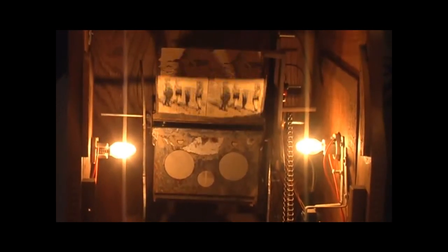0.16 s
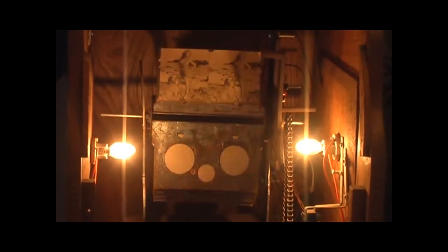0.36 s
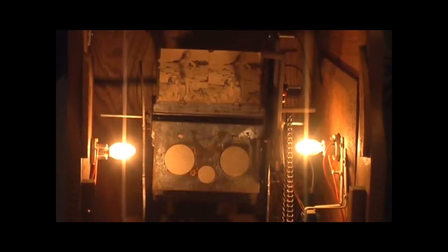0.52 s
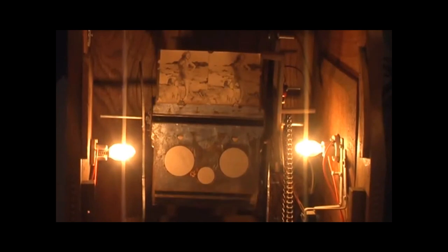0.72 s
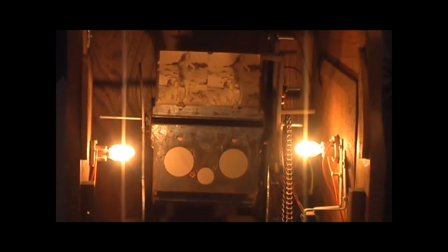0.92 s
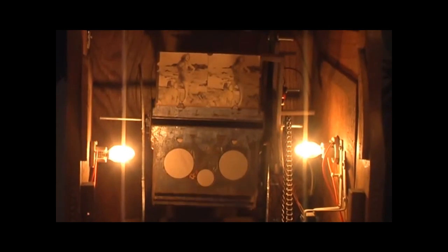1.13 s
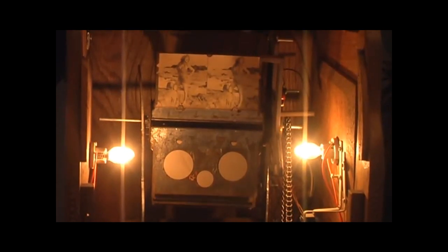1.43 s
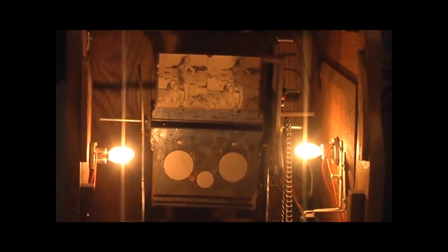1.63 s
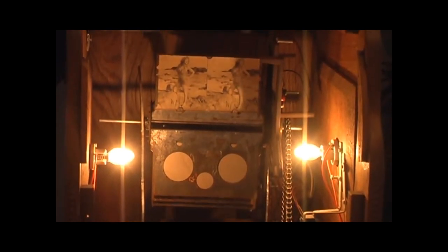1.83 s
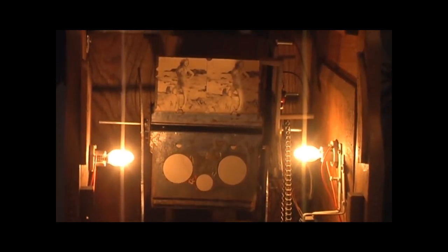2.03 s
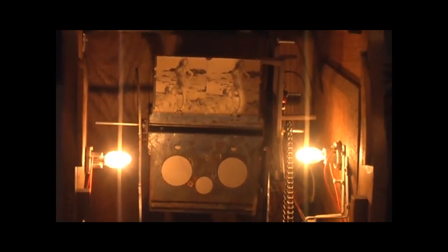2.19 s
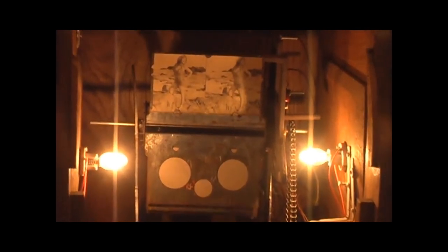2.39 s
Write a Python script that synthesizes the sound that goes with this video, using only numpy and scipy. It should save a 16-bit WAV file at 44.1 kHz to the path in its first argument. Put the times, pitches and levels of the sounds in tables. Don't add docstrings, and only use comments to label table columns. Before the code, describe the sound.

A stiff card clacks down sharply once over the gritty, pulsing whirr of a small motor

```python
import sys
import numpy as np
from scipy import signal
from scipy.fft import rfft, irfft
from scipy.io import wavfile
from scipy.ndimage import uniform_filter1d

SR = 44100
rng = np.random.default_rng(int(sys.argv[2]) if len(sys.argv) > 2 else 0)


def unload_wav(signal):
    wavfile.write(
        sys.argv[1],
        SR,
        np.round(np.clip(np.atleast_2d(signal).T, -1, 1) * 32767).astype(np.int16),
    )


def magnitude_from_level(level_db):
    exponent = np.asarray(level_db, float) / 20
    return 10 ** exponent


N = 112454

# pitch_hz, level_db (rms)
HUM_HARMONICS = [(120.2, -70.5), (239.9, -70), (359.7, -85)]
# pitch_hz, width_hz, level_db (rms)
FRAME_MODES = [(411.4, 22, -67), (517.8, 9.3, -63), (548, 4.1, -57), (601, 2.9, -63.5), (610.6, 52, -52),
               (620, 11.4, -64), (624.8, 7, -52.5), (746, 79, -68), (821, 49, -63)]
# time_s, level_db
FRAME_LEVEL = [(0.0, -45.5), (0.14, -44), (0.26, -51), (0.35, -45), (0.38, -50), (0.42, -45.5), (1.1, -45),
               (1.14, -53.5), (1.22, -47), (1.76, -44.5), (1.78, -48), (1.89, -40.5), (1.93, -46.5),
               (2.2, -46), (2.3, -52.5), (2.55, -46.5)]
# frequency_hz, density_db (per Hz)
RUMBLE_SPECTRUM = [(12, -78), (20, -43), (64, -60), (113, -23.5), (168, -20.5), (472, -10), (613, -2),
                   (933, -22), (1300, -16.5), (1690, -20), (2860, -120)]
# frequency_hz, density_db (per Hz)
AIR_SPECTRUM = [(20, -20), (60, -27), (150, -12), (400, -8), (900, -14.5), (2000, -13), (4000, -58)]
# start_s, length_s, strength_db
GEAR_RASPS = [(0.024, 0.038, -41), (0.12, 0.05, -49), (0.218, 0.046, -39.5), (0.318, 0.052, -38.5),
              (0.427, 0.037, -39), (0.628, 0.011, -38), (0.75, 0.01, -37), (0.831, 0.036, -38),
              (0.922, 0.047, -38.5), (1.043, 0.014, -37.5), (1.131, 0.018, -37.5), (1.241, 0.017, -37.5),
              (1.335, 0.028, -37), (1.438, 0.009, -71), (1.52, 0.0093, -37), (1.643, 0.016, -36),
              (1.735, 0.016, -38), (1.832, 0.027, -37.5), (1.927, 0.058, -42), (2.029, 0.01, -39),
              (2.131, 0.031, -36), (2.229, 0.03, -40), (2.329, 0.045, -43.5), (2.426, 0.022, -41.5),
              (2.526, 0.051, -42)]
# pitch_hz, width_hz, level_db
HOUSING_MODES = [(1469, 170, -12.5), (1671, 66, -2.5), (1927, 373, -12), (2477, 258, -11),
                 (2860, 350, -11.5), (3380, 1800, -15), (4440, 510, -13), (4790, 110, -6), (6620, 550, -22),
                 (7132, 395, -0.5), (7750, 780, -11.5), (8574, 305, -11)]
# frequency_hz, gain_db
FIZZ_SPECTRUM = [(700, -27.5), (1100, -15), (5400, -24), (8500, -12), (9100, -41.5), (9500, -61)]
# frequency_hz, gain_db
SIZZLE_SPECTRUM = [(9800, -70), (10350, -27), (11500, -25.5), (13200, -22.5), (14800, -26.5)]
# frequency_hz, t60_s
CABINET_DECAY = [(150, 1), (500, 0.39), (1200, 0.28), (3000, 0.3), (8000, 0.12), (15000, 0.28)]
# frequency_hz, side_minus_mid_db
SIDE_SPECTRUM = [(60, -18), (150, -11), (380, -21), (700, -21), (1400, -21), (2800, -14.5), (6000, -22.5),
                 (15000, -27.5)]
# start_s, level_db, contact_s, brightness_db
CARD_BLOWS = [
    (.406, -42, 0.025, -8),
    (.455, -43, 0.031, -3),
    (.476, -34, 0.004, -2),
    (0.4836, -15, 0.0069, 2),
    (0.498, -18.5, 0.003, -1.5),
    (0.491, -26, 0.054, -2),
    (0.514, -51, .006, 2),
    (0.546, -27, 0.0074, -23),
    (0.752, -35, 0.0066, -4),
    (0.781, -35.5, 0.011, -3),
]
# pitch_hz, level_db, t60_s
LEAF_MODES = [(445, -46, 0.043), (706, -45, 0.026), (910, -8, 0.05), (1000, -42, .06), (1104, -0.5, 0.062),
              (1450, -12, 0.022), (1740, -26, 0.015), (2020, -11, 0.031), (2224, 2.5, 0.031),
              (2420, -11, 0.025), (2870, -3, 0.012), (3300, -30, 0.021), (3830, -22, 0.0059)]
# frequency_hz, density_db (per Hz)
CRACK_SPECTRUM = [(120, -26), (250, -22), (1200, 1.5), (2300, -10), (3400, 1), (5200, -8), (7500, -6.5),
                  (15000, -21)]
# start_s, level_db, contact_s, pitch_hz
LEAF_TAPS = [(0.41, -38.5, 0.0082, 1095), (.424, -40, 0.0049, 2860), (0.457, -32.5, 0.019, 960),
             (0.4838, -18, .002, 3240), (0.4841, -19.5, 0.0023, 2066), (0.4825, -28, 0.0018, 7370),
             (0.4842, -25.5, .004, 1495), (.487, -18.5, 0.0025, 3610), (0.487, -30, 0.0097, 437),
             (.49, -33, .003, 1241), (0.497, -18.5, 0.0057, 2210), (0.5005, -34, 0.0028, 1210),
             (0.5, -26, 0.0026, 4020), (.506, -44, .003, 2020), (.511, -28, .003, 1924),
             (0.5129, -30, 0.0023, 1450), (0.515, -34, 0.0027, 1100), (0.53, -38, .005, 2060),
             (0.542, -32.5, 0.024, 1130), (0.57, -39, 0.0088, 1104), (0.753, -43, 0.0053, 1435),
             (0.754, -37.5, 0.011, 1087), (0.753, -35, 0.006, 3180), (.756, -52.5, 0.034, 190),
             (.77, -50.5, 0.042, 260), (0.782, -37.5, 0.0027, 2300), (0.783, -36, 0.019, 1083),
             (.484, -46.5, 0.026, 169.9)]

RUMBLE_DB, FRAME_REF_DB, ROOM_AIR_DB = -52, -47.5, -65.5
RASP_RISE_S, RASP_FALL_S, RASP_OVER_DB, IDLE_DB = 0.009, 0.004, 36, -7
CHATTER_HZ, CHATTER_TURN, CHATTER_DB, WOBBLE_DB = 45.05, 0.35, 1.52, 1.5
GRIT_PER_S, GRIT_SPREAD_DB, GRIT_DB = 9000, 4, -44
PATCH_DB, PATCH_S = 1.5, 0.0053
SIZZLE_PATCH_DB, SIZZLE_FOLLOWS, FIZZ_FOLLOWS = 1.5, 0.55, 0.09
CABINET_DB, GEAR_WET_DB, SCATTER_S = -3.5, -5.5, 0.15
BRIGHT_HZ, MODES_DB, CRACK_DB, LOW_CUT_HZ = 1370, -37.0, 3, 130
TAP_WIDTH_HZ, TAP_TONE = 114, 0.11


def evened(x):
    return x / np.sqrt(np.mean(x ** 2) + 1e-20)


def read(points, hz):
    f, value = np.transpose(points)
    return np.interp(np.log(hz + 1), np.log(f + 1), value)


def colour(x, points):
    hz = np.fft.rfftfreq(len(x), 1 / SR)
    return irfft(rfft(x) * magnitude_from_level(read(points, hz)), len(x))


def resonate(x, hz, width):
    pole = np.exp((2j * hz - width) * np.pi / SR)
    return 2 * signal.lfilter([1 - abs(pole)], [1, -pole], x + 0j).real


def drift(span_s):
    size = max(round(span_s * SR), 1)
    smooth = uniform_filter1d(rng.standard_normal(N), size)
    return evened(uniform_filter1d(smooth, size))


def motor():
    t = np.arange(N) / SR
    hum = np.zeros(N)
    for hz, db in HUM_HARMONICS:
        level = magnitude_from_level(db + 0.25 * drift(0.037)) * np.sqrt(2)
        hum += level * np.sin(2 * np.pi * (hz * t + rng.random()))
    frame = np.zeros(N)
    for hz, width, db in FRAME_MODES:
        ring = resonate(rng.standard_normal(N), hz, width)
        frame += magnitude_from_level(db) * evened(resonate(ring, hz, 2 * width))
    frame *= magnitude_from_level(np.interp(t, *np.transpose(FRAME_LEVEL)) - FRAME_REF_DB)
    rumble = evened(colour(rng.standard_normal(N), RUMBLE_SPECTRUM))
    return hum + frame + magnitude_from_level(RUMBLE_DB) * rumble


def room_air():
    return magnitude_from_level(ROOM_AIR_DB) * evened(colour(rng.standard_normal(N), AIR_SPECTRUM))


def tooth_pressure():
    t = np.arange(N) / SR
    power = magnitude_from_level(2 * IDLE_DB)
    for start, length, db in GEAR_RASPS:
        rise = np.clip((t - start) / RASP_RISE_S + 0.5, 0, 1)
        fall = np.exp(-np.maximum(t - start - length, 0) / RASP_FALL_S)
        power = power + magnitude_from_level(2 * (db + RASP_OVER_DB)) * (rise * fall) ** 2
    chatter_db = CHATTER_DB * np.sin(2 * np.pi * (CHATTER_HZ * t + CHATTER_TURN))
    return np.sqrt(power) * magnitude_from_level(chatter_db + WOBBLE_DB * drift(0.0089))


def gear():
    press = tooth_pressure()
    chance, size, sign = rng.random(N), rng.exponential(1, N), rng.standard_normal(N)
    clicks = (chance < GRIT_PER_S / SR) * magnitude_from_level(GRIT_SPREAD_DB * np.minimum(size, 4)) * sign
    grit = press * evened(clicks + 1.4 * sign)
    rings = np.zeros(N)
    for k, (hz, width, db) in enumerate(HOUSING_MODES):
        ring = resonate(resonate(grit, hz, width), hz, 2 * width)
        rings += (-1) ** k * magnitude_from_level(db + PATCH_DB * drift(PATCH_S)) * ring
    sizzle = press ** SIZZLE_FOLLOWS * magnitude_from_level(SIZZLE_PATCH_DB * drift(0.023)) * colour(grit, SIZZLE_SPECTRUM)
    fizz = press ** FIZZ_FOLLOWS * colour(grit, FIZZ_SPECTRUM)
    return magnitude_from_level(GRIT_DB + 18) * (rings + sizzle + fizz)


def cabinet(x):
    hz, t, z = signal.stft(rng.standard_normal(SR // 2), SR, nperseg=256)
    decay = magnitude_from_level(-60 * t / read(CABINET_DECAY, hz)[:, None])
    tail = signal.istft(z * decay, SR, nperseg=256)[1]
    tail *= np.minimum(np.arange(len(tail)) / (0.002 * SR), 1)
    return signal.oaconvolve(x, tail / np.linalg.norm(tail))[:N]


def scatter(mid):
    t = np.arange(SR // 5) / SR
    tail = rng.standard_normal(len(t)) * magnitude_from_level(-60 * t / SCATTER_S)
    return colour(signal.oaconvolve(mid, tail / np.linalg.norm(tail))[:N], SIDE_SPECTRUM)


def touch(start, length):
    u = np.maximum(np.arange(N) / SR - start, 0) / length
    return np.minimum(u / 0.33, 1) * np.exp(-u ** 2)


def card():
    contact = np.zeros(N)
    chatter = rng.standard_normal(N) * magnitude_from_level(2.93 * rng.standard_normal(N))
    low_pass = signal.butter(2, BRIGHT_HZ, fs=SR)
    for start, db, length, bright_db in CARD_BLOWS:
        burst = magnitude_from_level(db) * chatter * touch(start, length)
        dull = signal.lfilter(*low_pass, burst)
        contact += dull + magnitude_from_level(bright_db) * (burst - dull)
    t = np.arange(SR // 2) / SR
    modes = np.zeros(len(t))
    for hz, db, t60 in LEAF_MODES:
        modes += magnitude_from_level(db - 60 * t / t60) * np.sin(2 * np.pi * hz * t)
    ring = signal.oaconvolve(contact, modes)[:N]
    return magnitude_from_level(MODES_DB) * ring + magnitude_from_level(CRACK_DB) * colour(contact, CRACK_SPECTRUM)


def taps():
    t, out = np.arange(N) / SR, np.zeros(N)
    for start, db, length, hz in LEAF_TAPS:
        width = max(TAP_WIDTH_HZ * hz / 1000, TAP_WIDTH_HZ)
        noise = np.sign(rng.standard_normal(N))
        force = touch(start, length) * (noise + TAP_TONE * np.sin(2 * np.pi * hz * t))
        ring = resonate(resonate(force, hz, width), hz, 4 * width)
        out += magnitude_from_level(db) * ring / np.abs(ring).max()
    return out


def scene():
    hum, air, whirr = motor(), room_air(), gear()
    high_pass = signal.butter(4, LOW_CUT_HZ, "high", fs=SR)
    clack = signal.lfilter(*high_pass, card() + taps())
    mid = hum + whirr + clack + cabinet(magnitude_from_level(CABINET_DB) * clack + magnitude_from_level(GEAR_WET_DB) * whirr)
    side = scatter(mid) + air
    return np.array([mid + side, mid - side])


def top_cut(x):
    return signal.sosfilt(signal.butter(12, 16130, fs=SR, output="sos"), x)


def record(dry):
    edge = signal.firwin(511, 15050, window=("kaiser", 9), fs=SR)
    mix = signal.oaconvolve(dry, edge[None], "same")
    return top_cut(mix)


dry = scene()
out = record(dry)
unload_wav(out)
```